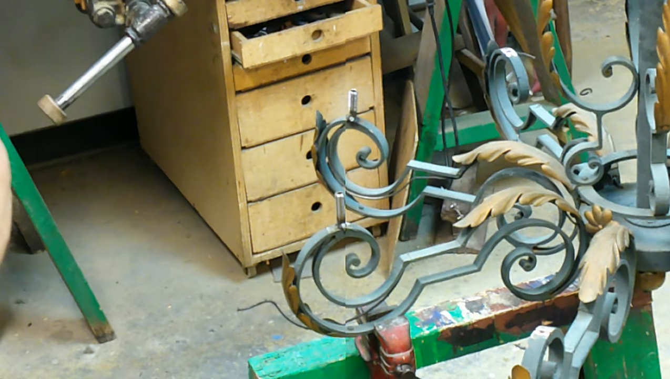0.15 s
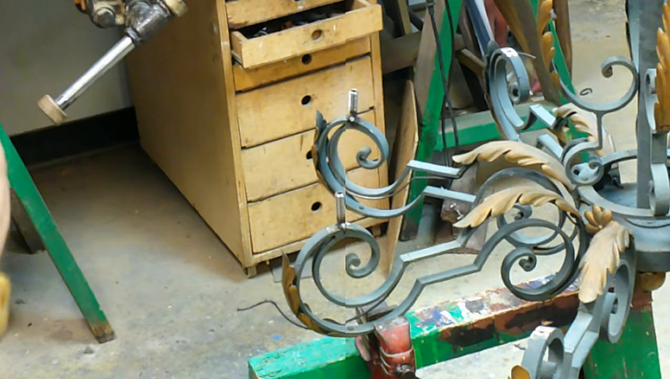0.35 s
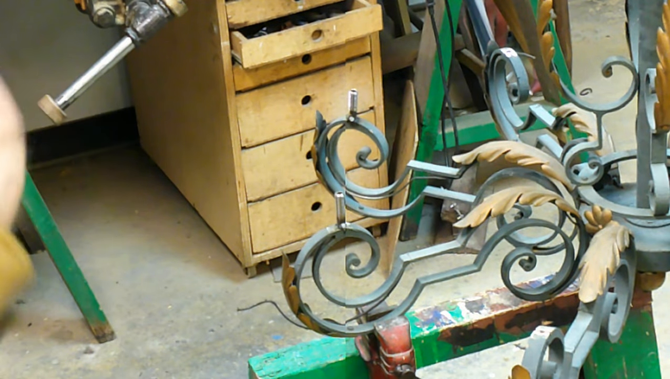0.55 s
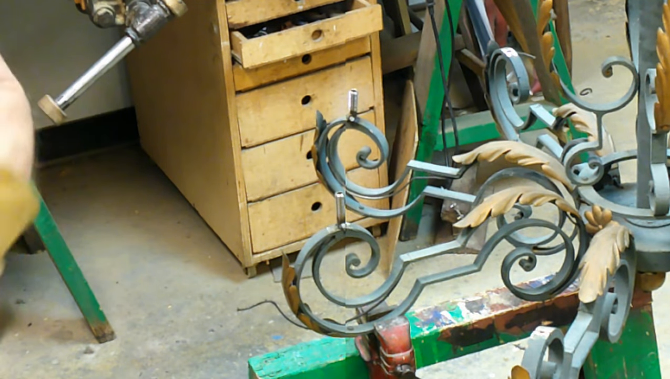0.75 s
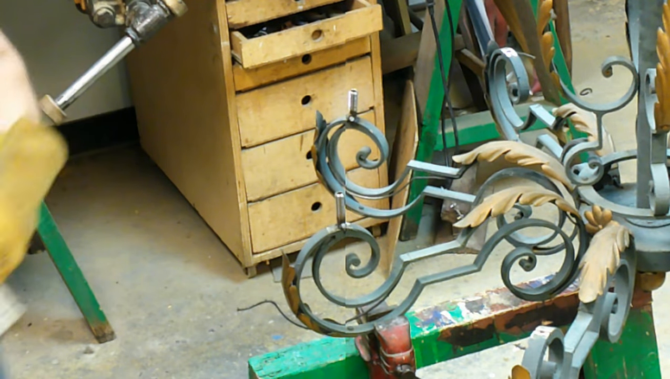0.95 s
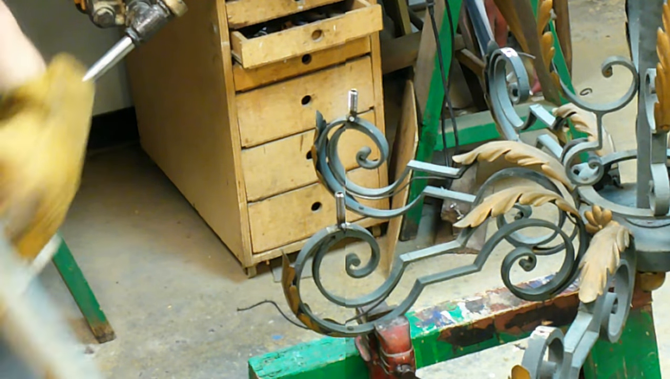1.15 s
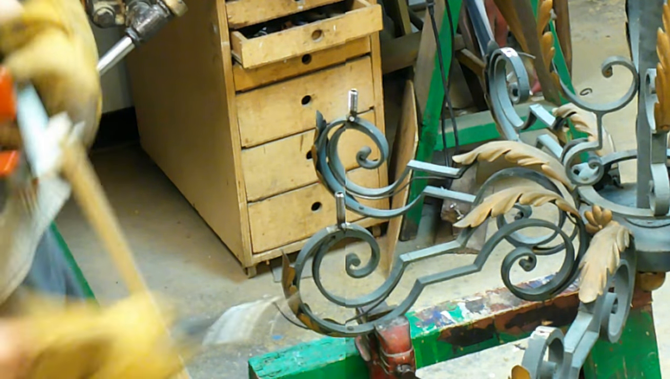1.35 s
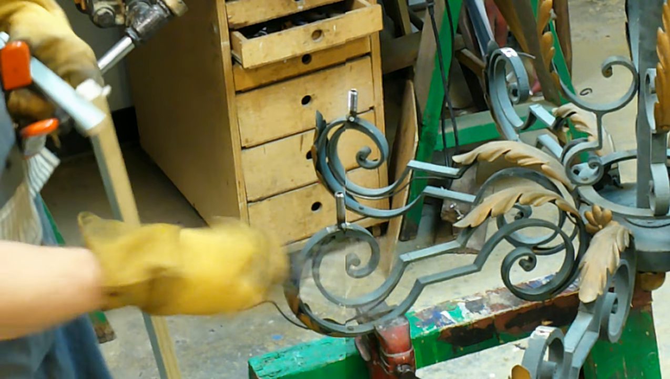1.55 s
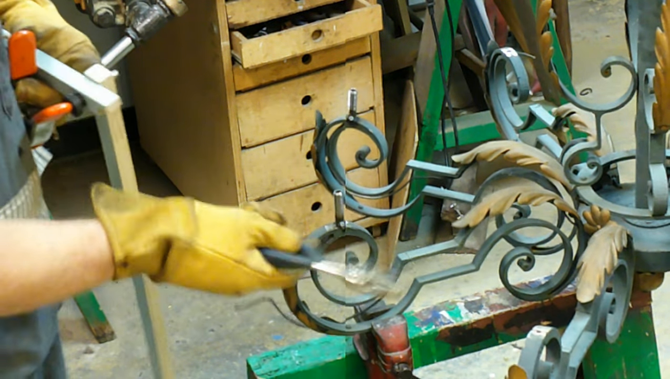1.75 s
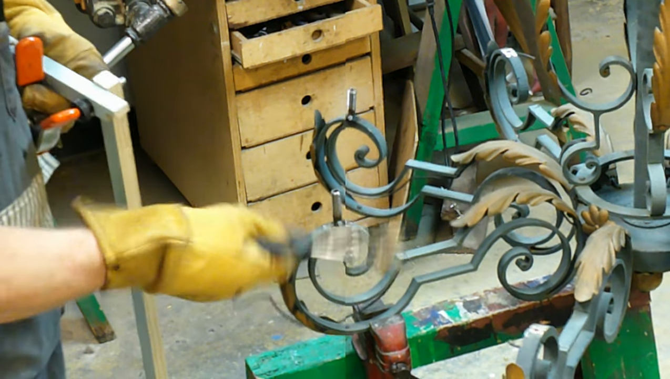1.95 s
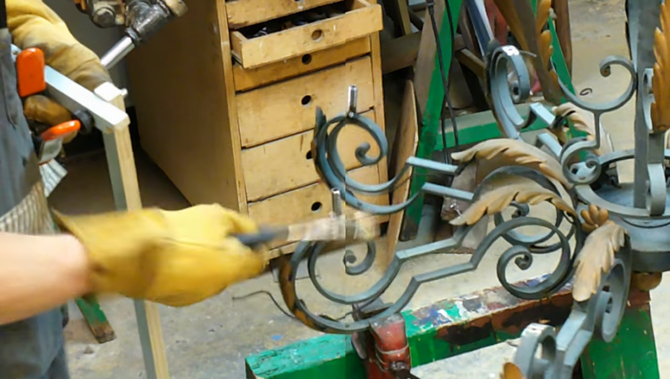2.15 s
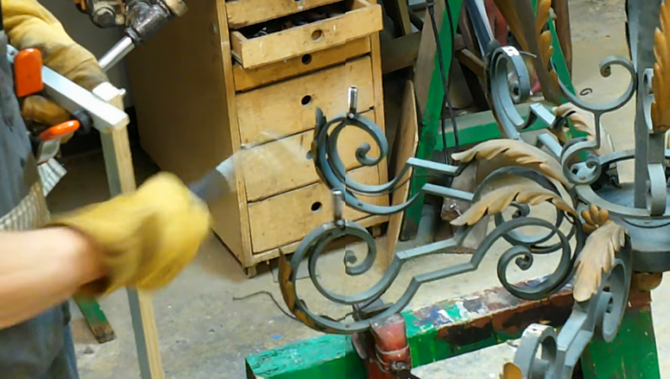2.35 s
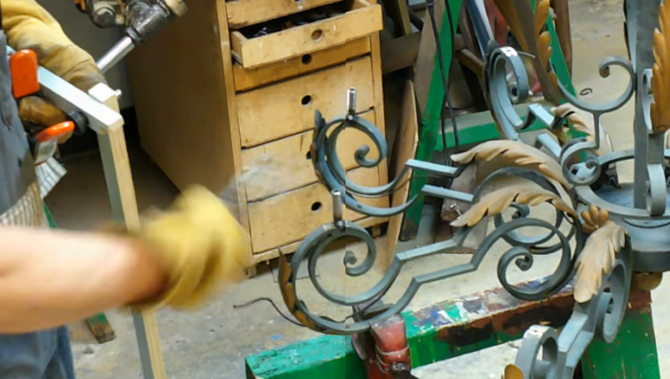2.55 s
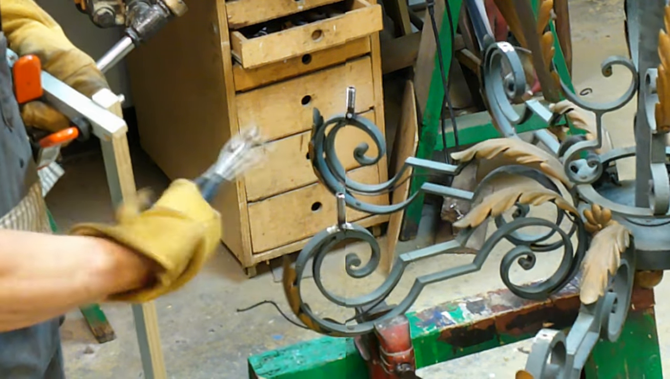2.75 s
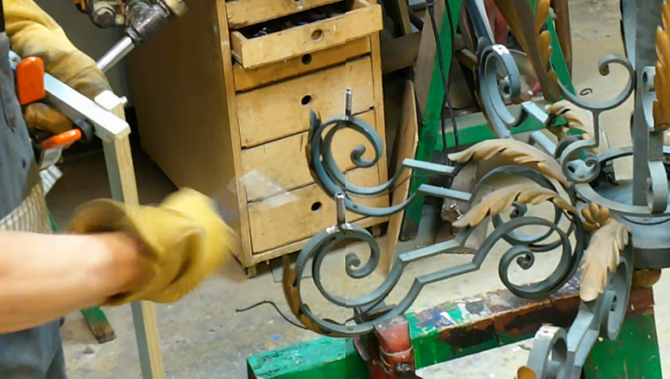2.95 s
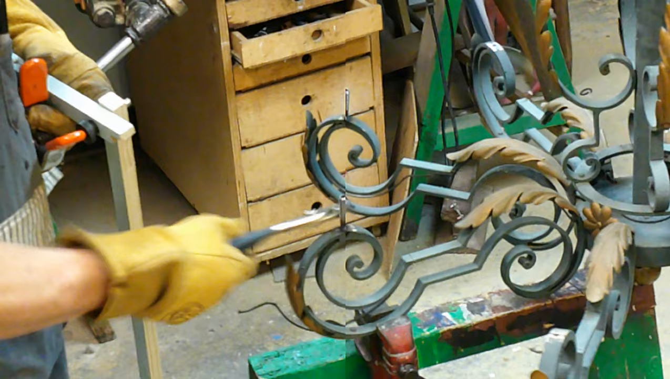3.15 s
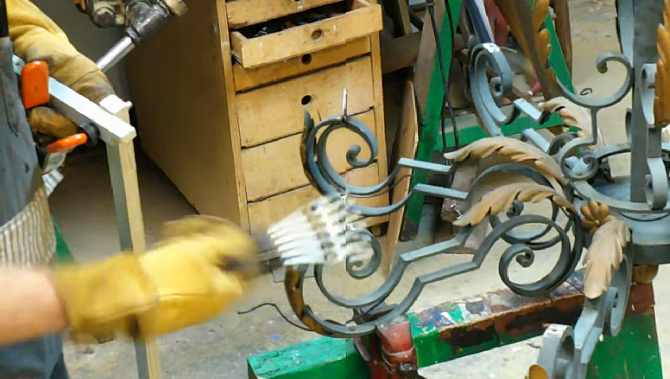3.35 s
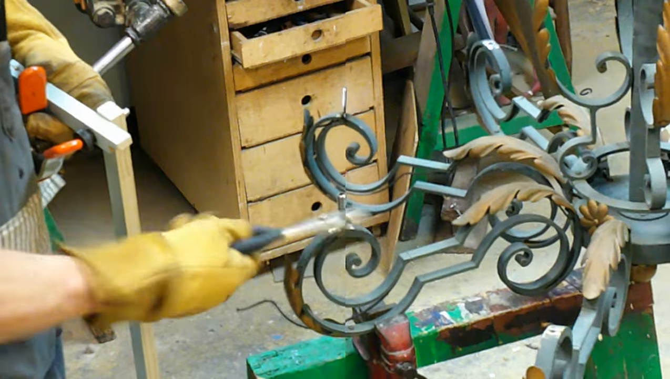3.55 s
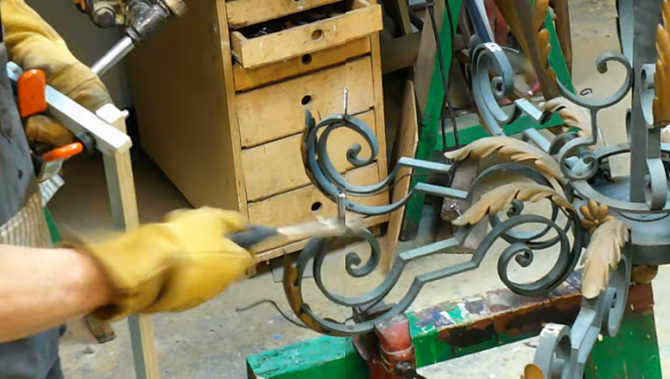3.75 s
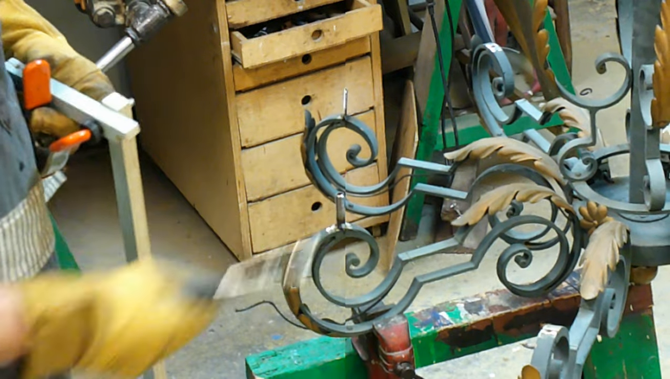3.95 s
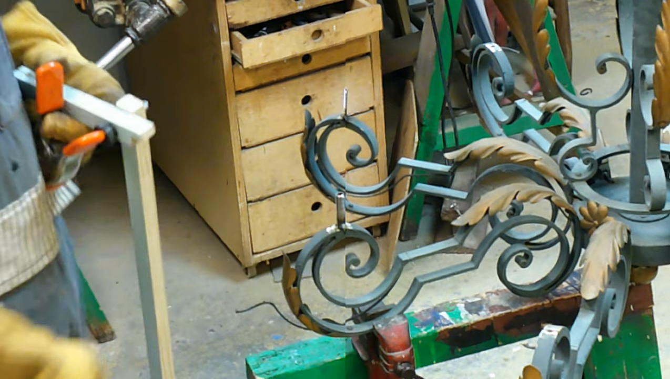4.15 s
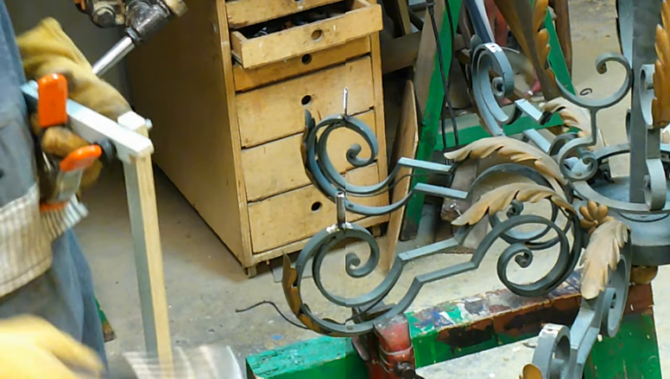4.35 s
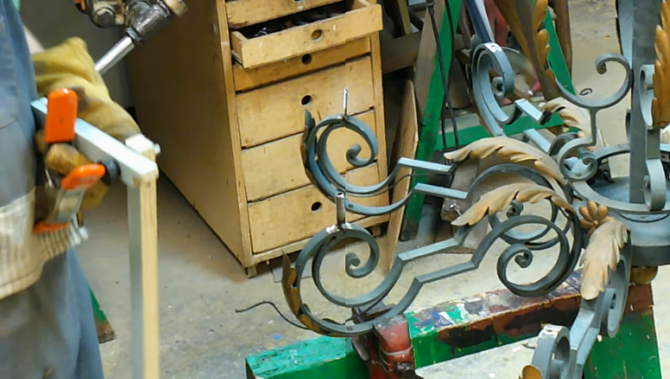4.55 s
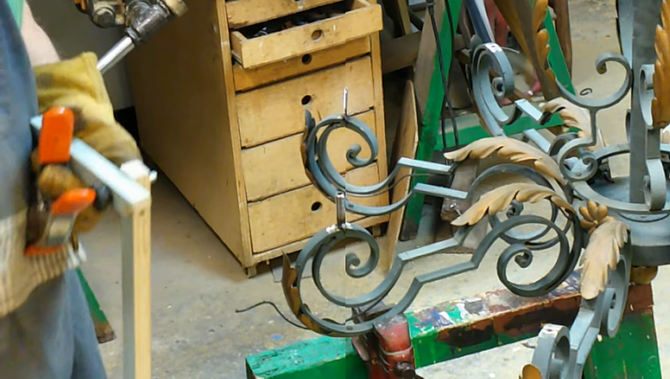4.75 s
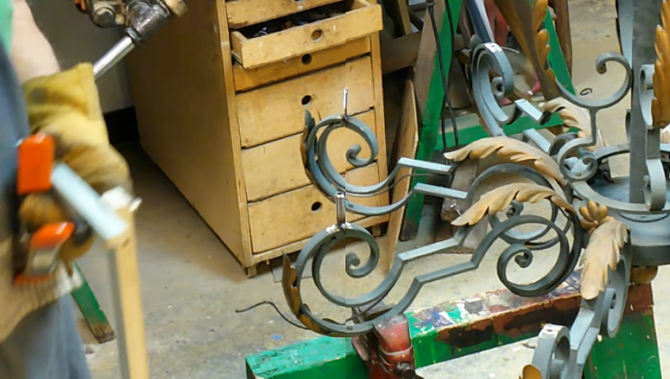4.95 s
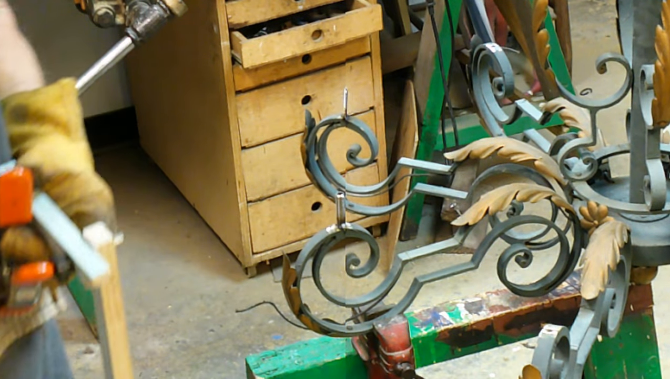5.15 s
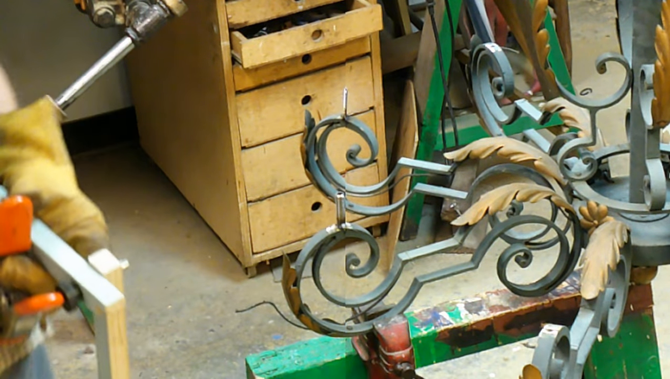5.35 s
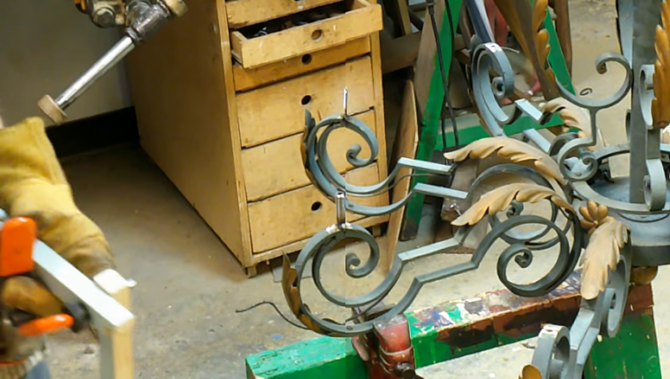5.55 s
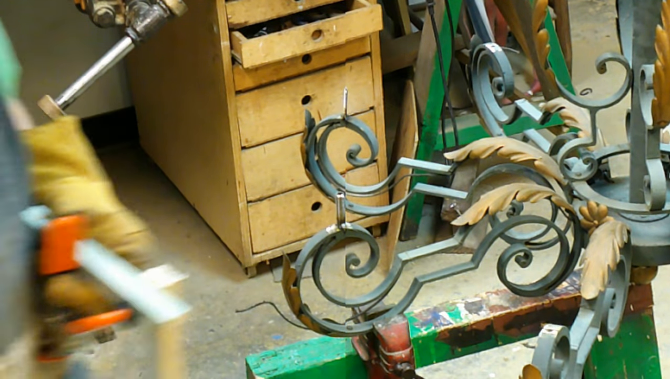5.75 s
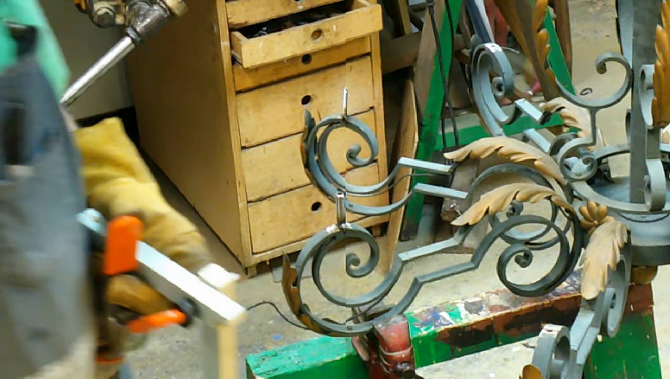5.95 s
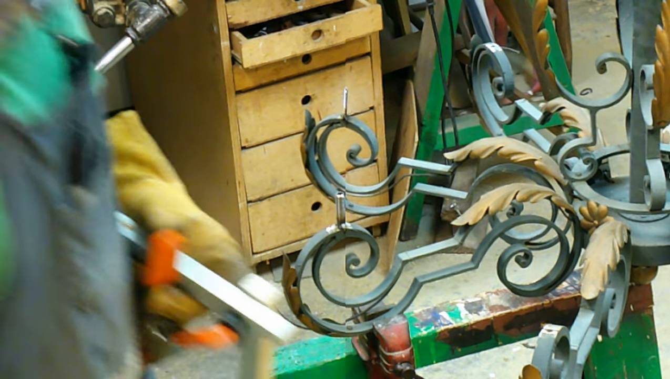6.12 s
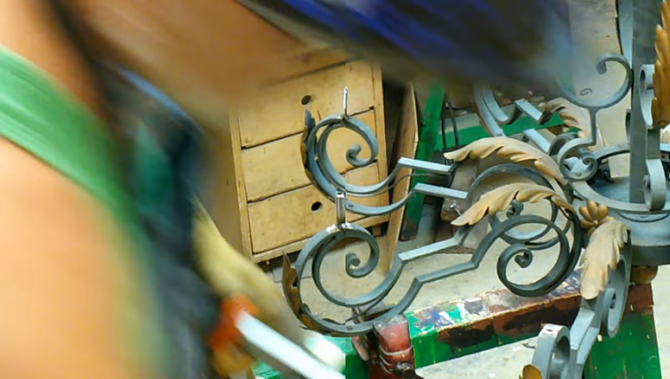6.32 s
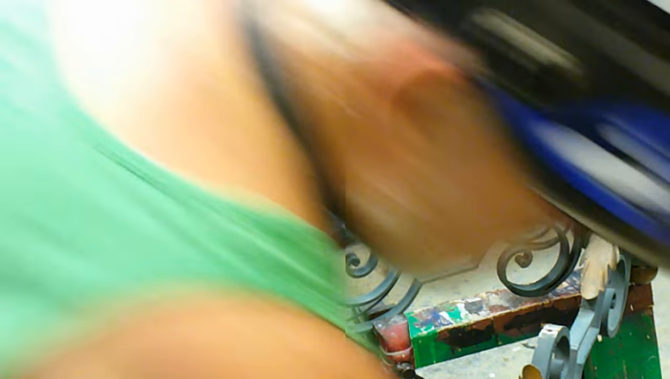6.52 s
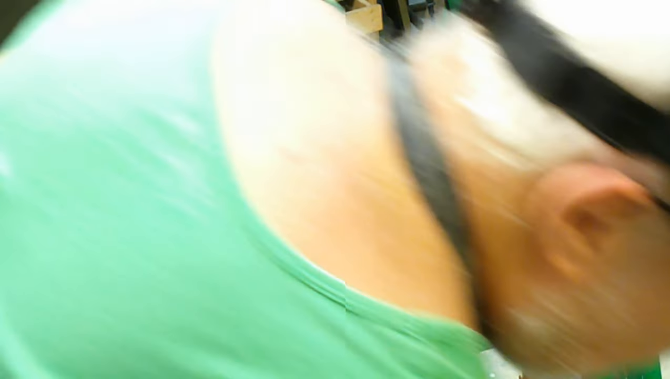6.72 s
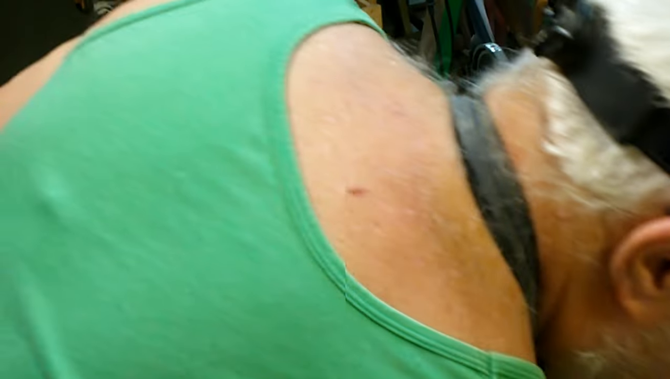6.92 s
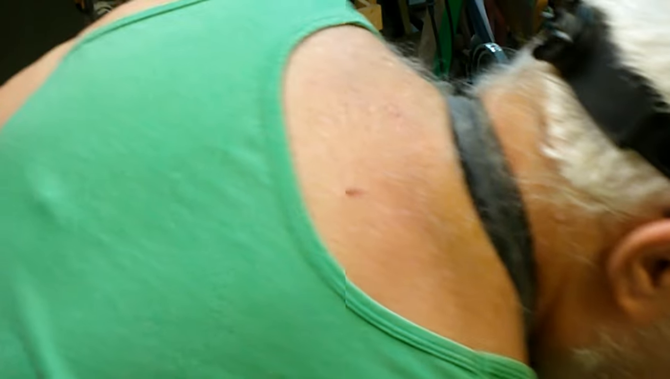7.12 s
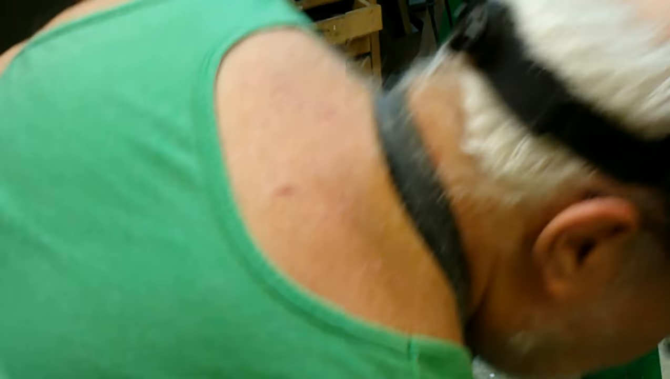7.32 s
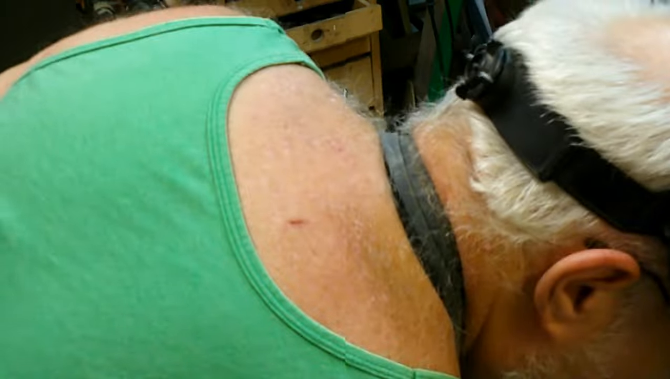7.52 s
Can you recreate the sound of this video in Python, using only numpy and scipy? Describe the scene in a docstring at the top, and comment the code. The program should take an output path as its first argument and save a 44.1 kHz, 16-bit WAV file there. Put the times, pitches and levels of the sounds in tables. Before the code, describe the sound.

Nine quick, sharp blows of a steel tool knock slag from a weld on an iron panel, which rings through each clash and slightly distorts a microphone with limited treble. Before them come a clank of steel and a knock on wood; afterwards only small clicks, a brief tinkle and the scuff of work clothes. A fan hums steadily in the small workshop, falling away just at the end.

```python
"""A steel hand tool knocks slag off a fresh weld on a wrought-iron scroll panel in nine quick blows.
Each blow is a bright crack and a dense clash, with the panel's long modes ringing through it.
A steel clank and a dull wooden knock come first; handled tools click and tinkle, work clothes scuff.
A machine fan rushes and hums in the small, hard-walled workshop and falls away near the end.
The blows overload a narrow-band microphone."""
import sys
import numpy as np
from scipy import signal
from scipy.fft import rfft, irfft, next_fast_len
from scipy.io import wavfile
from scipy.ndimage import map_coordinates

SR = 44100
rng = np.random.default_rng(int(sys.argv[2]) if len(sys.argv) > 2 else 0)


def transcribe(u):
    """Save the signal u as a 16-bit wav file named by the first command-line argument.

    u: samples, shape (n,) or (channels, n), limited to [-1, 1]; the rate is SR.
    q: integer samples, one column per channel.
    """
    v = np.clip(np.atleast_2d(u).T, -1, 1)
    q = np.round(v * 32767).astype(np.int16)
    wavfile.write(sys.argv[1], SR, q)


N = 338688
BAND_HZ = 7330  # top of the microphone's band
RING_T = np.arange(SR) / SR  # seconds after a contact


def amp(db):
    """Decibels to gain."""
    return 10 ** (np.asarray(db) / 20)


def along(points, hz):
    """Read a curve of (hz, value) points on a log frequency axis."""
    point_hz, values = np.transpose(points)
    return np.interp(np.log(hz + 1), np.log(point_hz + 1), values)


def bumps(peaks, hz):
    """Resonances as bell curves, in dB over frequency."""
    return sum(db / (1 + (2 * (hz - centre) / width) ** 2) for centre, width, db in peaks)


def wobble(rate_hz):
    """A smooth random curve through rate_hz points a second."""
    points = rng.standard_normal(int(N * rate_hz / SR) + 4)
    return map_coordinates(points, [np.arange(N) * rate_hz / SR])


def noise(colour_db, size=SR):
    """Noise of rms 1 with a spectrum in dB, inside the microphone's band."""
    padded = next_fast_len(size)
    hz = np.fft.rfftfreq(padded, 1 / SR)
    spectrum = rfft(rng.standard_normal(padded)) * amp(colour_db(hz)) * (hz < BAND_HZ)
    hiss = irfft(spectrum, padded)[:size]
    return hiss / np.sqrt(np.mean(hiss ** 2) + 1e-20)


def lowpass(sound, edge_hz, slope_width_hz=200):
    """A steep treble cut."""
    padded = next_fast_len(N + SR // 2)
    gain = np.clip((edge_hz - np.fft.rfftfreq(padded, 1 / SR)) / slope_width_hz + .5, 0, 1)
    return irfft(rfft(sound, padded) * gain, padded)[:N]


def add(track, start_s, sound):
    """Mix a sound into the track."""
    part = track[max(round(start_s * SR), 0):][:len(sound)]
    part += sound[:len(part)]


def attack(rise_s):
    """The contact force takes a moment to build."""
    return 1 - np.exp(-RING_T / rise_s)


def decay(t60_s):
    """An exponential die-away, 60 dB down after t60_s."""
    return amp(-60 * RING_T / max(t60_s, .005))


def crack(t60_s, tilt_db):
    """The bright first instant of a hard contact."""
    return noise(lambda hz: along([(500, -tilt_db), (6000, 0.015)], hz)) * decay(t60_s)


def ring(modes, scatter_db, split_hz=0, phase_spread=1):
    """Decaying modes, excited differently by each contact; a mode split into a close pair beats."""
    total = np.zeros(len(RING_T))
    for (hz, db, t60_s), (size, phase, gap, lag) in zip(modes, rng.standard_normal((len(modes), 4))):
        beat = np.cos(np.pi * split_hz * (np.exp(0.42 * gap) * RING_T + 0.097 * lag))
        tone = np.sin(2 * np.pi * (hz * RING_T + phase_spread * phase))
        total += amp(db + scatter_db * size) * decay(t60_s) * beat * tone
    return total / np.sqrt(sum(amp(db) ** 2 for _, db, _ in modes) / 2)


# The workshop's reverb time: freq_hz, t60_s
ROOM_DECAY = [(150, 0.74), (1000, 0.56), (3000, 0.56), (7000, 0.38)]

def in_room(sound, wet_db, build_s=0.002):
    """A contact plus the hard walls' dense answer, which builds up within milliseconds."""
    hz, t, spectra = signal.stft(rng.standard_normal(SR // 2), SR, nperseg=256)
    fade = amp(-60 * t / along(ROOM_DECAY, hz)[:, None])
    tail = signal.istft(spectra * fade, SR, nperseg=256)[1]
    tail *= 1 - np.exp(-np.arange(len(tail)) / SR / build_s)
    return sound + amp(wet_db) * signal.fftconvolve(sound, tail / np.linalg.norm(tail))[:len(sound)]


# Tone of the rushing air: freq_hz, gain_db
AIR_EQ = [(15, -58.5), (25, -22.5), (177, -14), (204, -9.5), (235, -5.5), (386, -14), (415, -5),
          (563, -9.5), (619, -4), (784, -5.5), (882, -2.5), (993, -3), (3230, -13), (4940, -23),
          (7040, -23), (9150, -66), (15500, -120)]
# Resonances of the fan housing: centre_hz, width_hz, gain_db
HOUSING_PEAKS = [(245, 20, 4), (700, 17, 6.5), (867, 17, 7), (1318, 80, 5), (3160, 990, 2),
                 (5200, 570, -3.5)]
# Blade hum, balanced against the rush: pitch_hz, level_db
BLADE_HUM = [(210.5, -14.5), (420, -24), (629, -16), (866, -18)]

def fan(level_db=-35.5, flutter_db=0.52, waver_db=2, drift_cycles=0.13,
        fall_at_s=7.42, fall_db=8.5, fall_time_s=0.16):
    """Air rushes through the fan's housing over the unsteady hum of its blades; both fall away late."""
    t = np.arange(N) / SR
    air = noise(lambda hz: along(AIR_EQ, hz) + bumps(HOUSING_PEAKS, hz), size=N)
    air *= amp(flutter_db * wobble(11))
    hum = np.zeros(N)
    for hz, db in BLADE_HUM:
        strength = np.sqrt(2) * amp(db + waver_db * wobble(7))
        drift_s = drift_cycles / BLADE_HUM[0][0] * wobble(7.4)
        hum += strength * np.sin(2 * np.pi * hz * (t + drift_s))
    fallen = 1 - np.exp(-np.maximum(t - fall_at_s, 0) / fall_time_s)
    return (air + hum) * amp(level_db - fall_db * fallen)


# Soft scuffs of work clothes and gloves: peak_s, level_db, centre_hz
SCUFF_CUES = [(4.678, -36.5, 1770), (6.231, -45.5, 5500), (7.213, -41.5, 2900)]

def scuffs(length_s=0.055, octave_drop_db=9):
    """Cloth and leather brush past in short swells of hiss."""
    out = np.zeros(N)
    swell = np.exp(-(2 * (RING_T - .5) / length_s) ** 2)
    for peak_s, db, centre_hz in SCUFF_CUES:
        hiss = noise(lambda hz: -octave_drop_db * np.log2((hz + 1) / centre_hz) ** 2)
        add(out, peak_s - .5, amp(db) * hiss * swell)
    return out


# Touches of a small steel part: start_s, level_db
TINKLE_CUES = [(5.2305, -22.5), (5.237, -32)]
# Its thin, high ring: pitch_hz, relative_db, t60_s
TINKLE_RING = [(3330, 1, .08), (6490, 16, 0.033), (6640, -9, 0.18), (6750, -6, .15)]

def tinkles():
    """A small steel part touches and bounces once."""
    out = np.zeros(N)
    for start_s, db in TINKLE_CUES:
        add(out, start_s, amp(db) * in_room(ring(TINKLE_RING, scatter_db=1), wet_db=-6))
    return out


# Light tool clicks, the snap balanced against the clatter: start_s, level_db, snap_db
CLICK_CUES = [(.011, -23, -17), (.082, -32.5, -8), (.622, -34, 2), (.868, -32.5, -4), (1.389, -26.5, -14),
              (5.213, -19.5, -11), (5.233, -30, -8), (7.416, -22, 4), (7.427, -22.5, -1)]
# Tone of the clatter: freq_hz, gain_db
CLICK_EQ = [(120, -51), (200, -15.5), (447, -11.5), (593, -9), (1130, -1), (2010, -3), (2240, -6),
            (3150, -3.5), (3710, -10), (7040, -20.5), (9150, -56), (15500, -120)]

def clicks():
    """A handled tool gives a sharp snap and a short, duller clatter."""
    out = np.zeros(N)
    for start_s, db, snap_db in CLICK_CUES:
        clatter = noise(lambda hz: along(CLICK_EQ, hz)) * decay(t60_s=0.1)
        snap = amp(snap_db) * crack(t60_s=0.013, tilt_db=11.5)
        add(out, start_s, amp(db) * in_room(clatter + snap, wet_db=-6.5))
    return out


# Dull knocks on wood, one firm and the rest faint: start_s, level_db
KNOCK_CUES = [(.547, -18.5), (0.561, -18.5), (0.7173, -3.5), (.768, -19.5), (1.391, -19.5), (5.192, -17),
              (5.2132, -18.5)]
# The wood's short ring: pitch_hz, relative_db, t60_s
WOOD_RING = [(495, -13, 0.098), (640, -15.5, 0.08), (837, -10, 0.096), (935, 2, 0.018), (1070, -18.5, .06),
             (2740, -12, 0.018)]
# Tone of the thud: freq_hz, gain_db
THUD_EQ = [(88, -60), (150, -22), (340, -51), (480, -8), (598, -3.5), (969, 0.5), (1380, -6), (1650, -14.5),
           (3030, -16), (4680, -34), (7000, -37), (9100, -77.5), (15400, -120)]

def knocks(body_db=-1, thud_db=-8.5):
    """Wood's damped modes all start in step, so each knock is one short push."""
    out = np.zeros(N)
    for start_s, db in KNOCK_CUES:
        thud = amp(thud_db) * noise(lambda hz: along(THUD_EQ, hz)) * decay(t60_s=0.11)
        body = amp(body_db) * ring(WOOD_RING, scatter_db=4.0, phase_spread=.03)
        add(out, start_s, amp(db) * in_room((thud + body) * attack(0.00076), wet_db=-9))
    return out


# The opening clank of steel: start_s, level_db
CLANK_CUES = [(0.4663, -8)]
# The loose piece's ring: pitch_hz, relative_db, t60_s
CLANK_RING = [(1319, -7.5, 0.16), (1880, -3.5, 0.23), (2546, -0.5, .31), (2690, -23, .2), (2820, -27, .22),
              (3260, 4, 0.19), (4030, -3, 0.17), (4140, 9, 0.035), (4430, -4.5, 0.082), (5840, -2.5, 0.09)]
# Tone of its clatter: freq_hz, gain_db
CLANK_EQ = [(35, -81), (60, -55), (211, -14.5), (376, -27), (903, -14), (1100, -8.5), (1290, -6.5),
            (2210, -5), (2500, -1.5), (3300, -5), (3650, -11.5), (5880, -16.5), (7040, -19), (9150, -57),
            (15500, -120)]

def clank(modes_db=3):
    """A loose steel piece rings in a few strong modes over a burst of clatter."""
    out = np.zeros(N)
    for start_s, db in CLANK_CUES:
        clatter = noise(lambda hz: along(CLANK_EQ, hz)) * decay(t60_s=0.23)
        modes = amp(modes_db) * ring(CLANK_RING, scatter_db=.5)
        add(out, start_s, amp(db) * in_room((clatter + modes) * attack(0.00082), wet_db=-14))
    return out


# Blows on the panel; each struck spot boosts two resonances:
# start_s, level_db, boost_db, first_peak_hz, second_peak_hz
BLOW_CUES = [(1.651, 1, 4, 1380, 2690), (1.887, -2.5, -2, 1740, 3400), (2.121, -6, 3.5, 1010, 4900),
             (2.360, -8.5, 7.5, 720, 3240), (2.651, -0.5, 1.5, 1440, 3540), (2.9027, -3, 5, 1790, 4220),
             (3.145, -3.5, 6, 1800, 1980), (3.566, -2.5, -1, 1370, 3420), (3.800, -4.5, 11, 3090, 6730)]
# The iron panel's strongest modes: pitch_hz, relative_db, t60_s
PANEL_RING = [(543, -17, 1.4), (706, -10, .45), (957, -7, .45), (1060, -9, .3), (1187, -11, .6),
              (1358, -3, .5), (1454, 0, .35), (1593, -14, 1.5), (1710, -3, .3), (1754, -2, .3),
              (1846, -10, .55), (2015, -5, .5), (2352, -6, .3), (2535, -9, .45), (2740, -10, .5),
              (3070, -5, .3), (3164, -5, .4), (3340, -4, .25), (3468, -2, .4), (3623, -4, .3),
              (3960, -10, .35), (4259, -4, .28), (4918, -11, .35), (5512, -24, 1.3), (5835, -19, .7),
              (6341, -8, .35), (6858, -18, .9)]
# Tone of the clash and its shimmer: freq_hz, gain_db
CLASH_EQ = [(40, -44), (120, -28.5), (250, -14), (450, -10.5), (700, -6), (1250, 1), (2100, -1), (3200, 2),
            (4200, -3.5), (5100, -11), (6450, -0.5), (7200, -10.5)]

def panel_blows(clash_db=-3, crack_db=-9, long_ring_db=-7, modes_db=-5, shimmer_db=-26,
                crossover_hz=1300, spread_s=0.012, spot_width_hz=130, rebound_s=0.022, rebound_db=-10.5):
    """Each blow sets off a dense clash of short modes, with the panel's long modes ringing through it."""
    out = np.zeros(N)
    low_band = signal.butter(2, crossover_hz, fs=SR, output="sos")
    swell = 1 - 0.67 * np.exp(-RING_T / spread_s)  # slow bending waves take time to spread
    for start_s, db, boost_db, *peaks_hz in BLOW_CUES:
        low_t60_s = 0.37 - 0.031 * db  # lighter blows damp the panel less
        tilt = [(700, -0.5), (2500, 0), (6000, 0.5 + 0.7 * db)]  # harder blows are brighter
        spot = [(hz, spot_width_hz, boost_db) for hz in peaks_hz]
        wash = noise(lambda hz: along(CLASH_EQ, hz) + along(tilt, hz) + bumps(spot, hz))
        lows = signal.sosfiltfilt(low_band, wash)
        clash = (wash - lows) * decay(0.54 * low_t60_s) + lows * swell * decay(low_t60_s)
        # many weak modes shimmer on after the clash
        shimmer = noise(lambda hz: along(CLASH_EQ, hz) + along(tilt, hz)) * decay(t60_s=1.0)
        spot_modes = [(hz, level + 0.9 * bumps(spot, hz), t60_s) for hz, level, t60_s in PANEL_RING]
        modes = ring(spot_modes, scatter_db=1.46, split_hz=5.2)
        long_ring = amp(modes_db) * modes + amp(shimmer_db) * shimmer
        # the long ring is about as strong after every blow, hard or light
        blow = amp(clash_db) * clash + amp(long_ring_db - db) * long_ring
        blow += amp(crack_db) * crack(t60_s=0.1, tilt_db=10)
        # the tool bounces and touches again
        bounce_s = rebound_s * np.exp(0.17 * rng.standard_normal())
        add(blow, bounce_s, amp(crack_db + rebound_db) * crack(t60_s=0.049, tilt_db=8))
        add(out, start_s, amp(db) * in_room(blow * attack(0.00079), wet_db=-14.5))
    return out


def scene(low_cut_hz=130):
    """The workshop's mono mix at one small microphone, which takes little bass from the hits."""
    low_cut = signal.butter(2, low_cut_hz, "high", fs=SR, output="sos")
    hits = signal.sosfilt(low_cut, panel_blows() + clank() + knocks() + clicks())
    return (hits + tinkles() + scuffs() + fan())[None]


def record(dry, ceiling=1.16, top_hz=15900):
    """The input stage saturates, the band is cut, and the remaining overshoots clip at full scale."""
    saturated = dry[0] / (1 + np.abs(dry[0] / ceiling) ** 6) ** (1 / 6)
    clipped = np.clip(lowpass(saturated, BAND_HZ), -1, 1)
    return lowpass(clipped, top_hz)[None]


dry = scene()
out = record(dry)
transcribe(out)
```